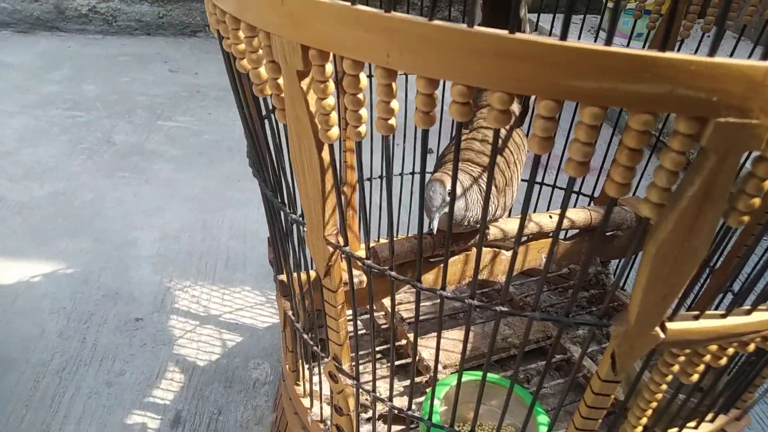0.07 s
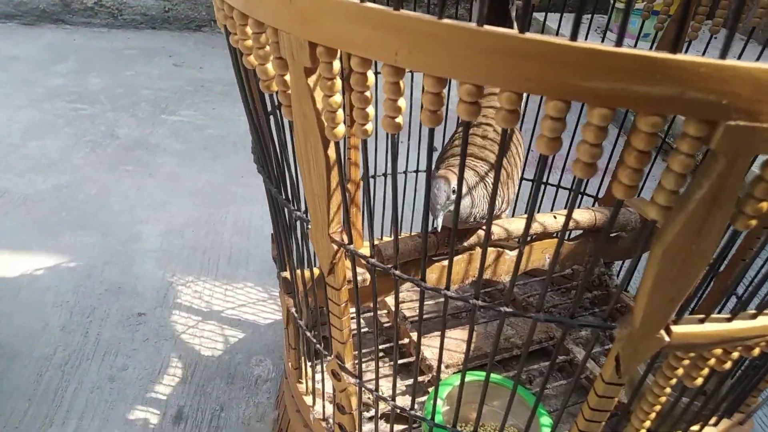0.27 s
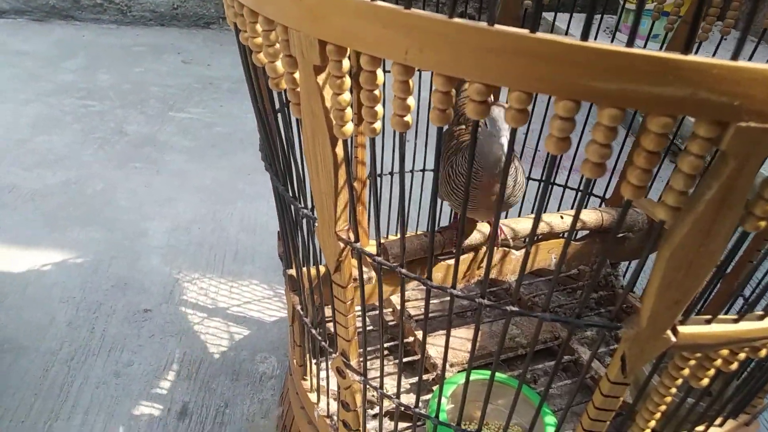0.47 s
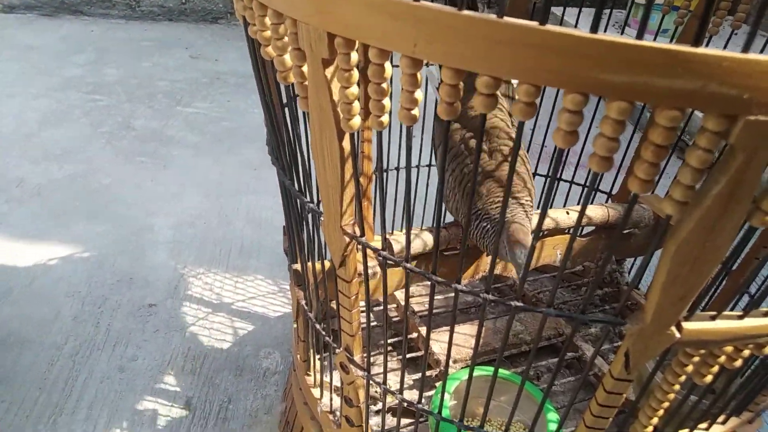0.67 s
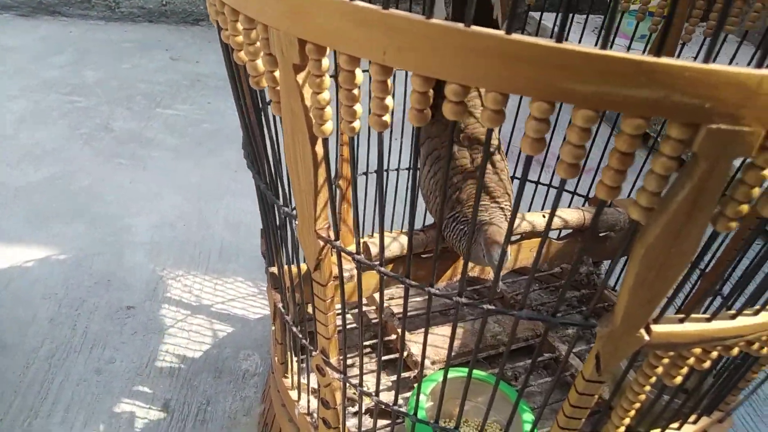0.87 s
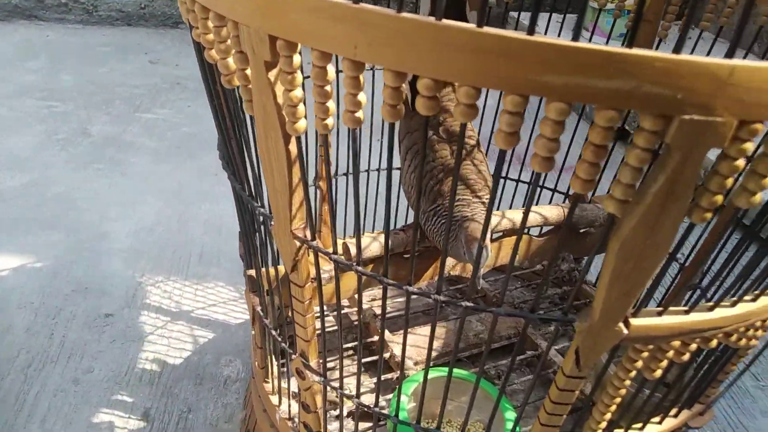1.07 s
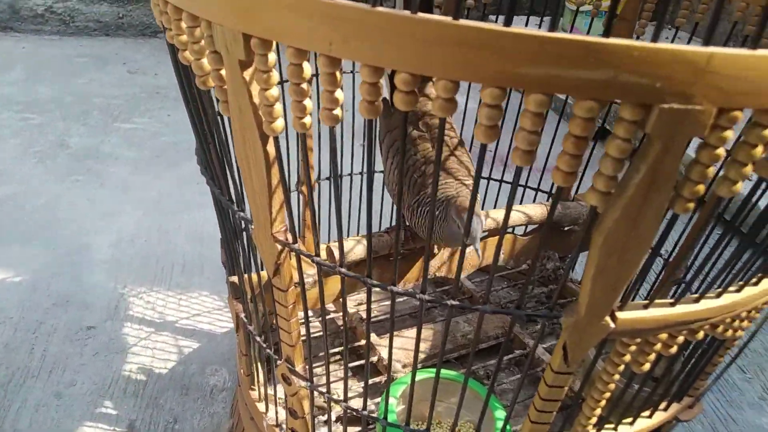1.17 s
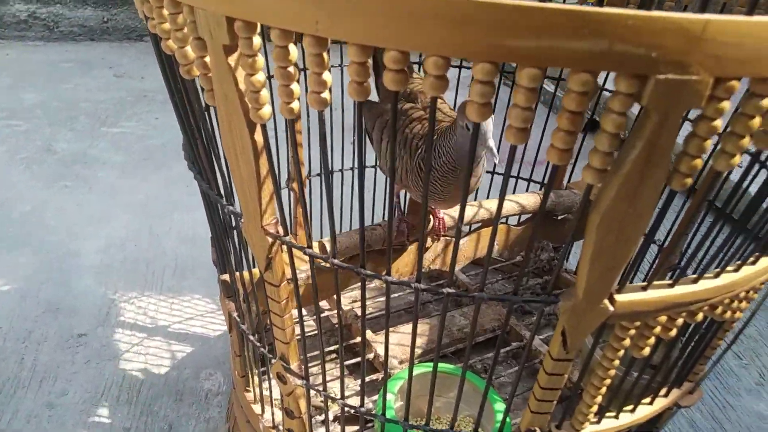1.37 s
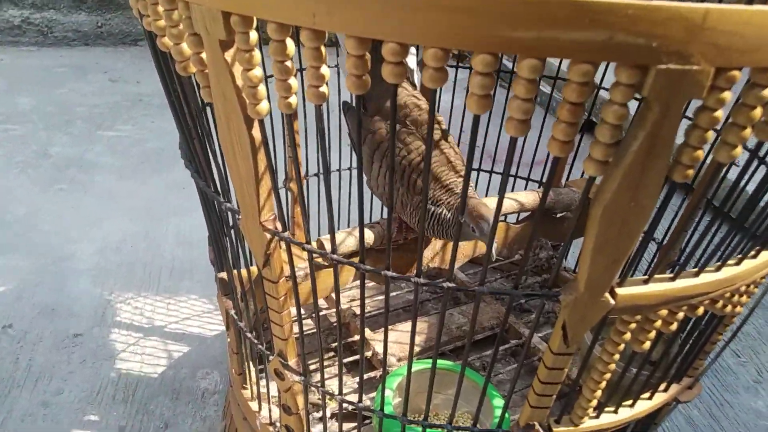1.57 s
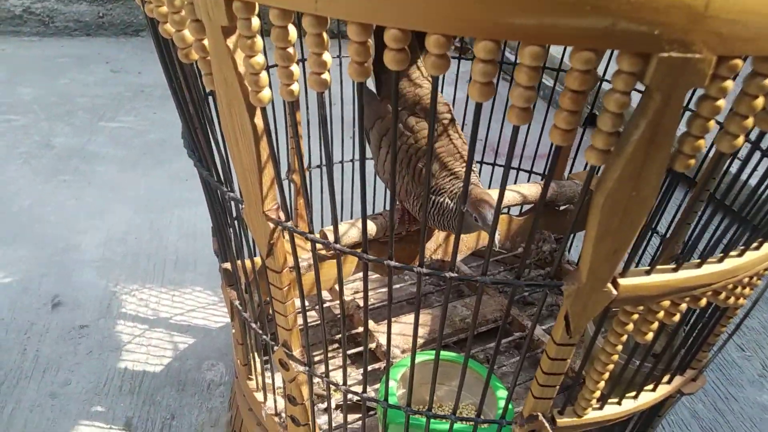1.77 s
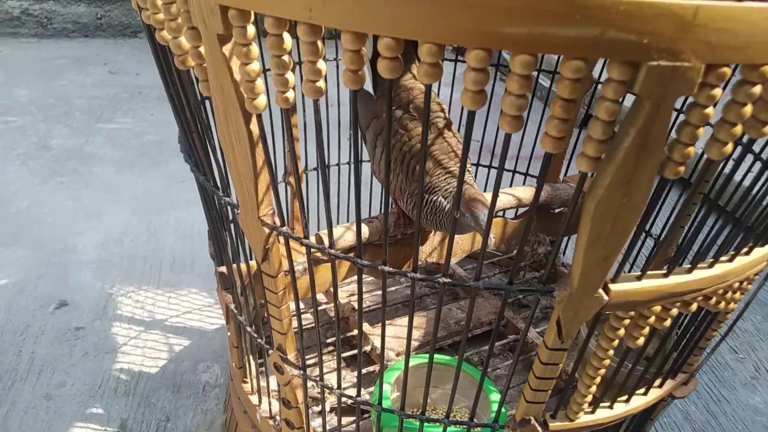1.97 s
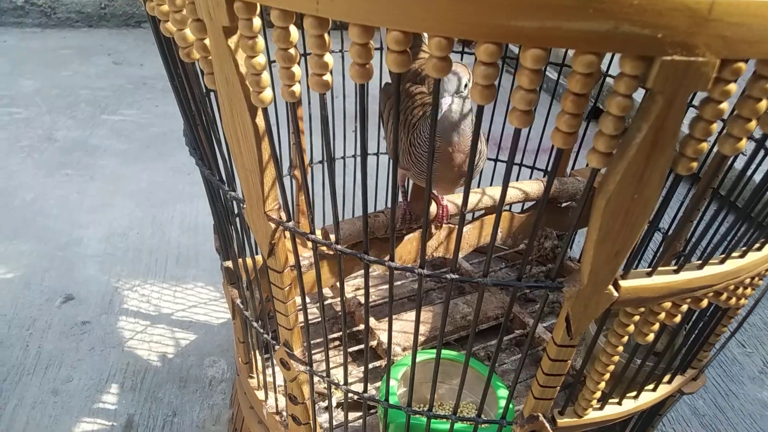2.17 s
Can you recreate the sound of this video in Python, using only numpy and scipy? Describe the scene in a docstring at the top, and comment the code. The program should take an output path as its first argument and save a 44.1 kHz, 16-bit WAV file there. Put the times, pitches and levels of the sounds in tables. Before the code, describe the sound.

Dove cooing close by, three buzzy rolling notes, with faint wire clinks and perch knocks outdoors.

```python
"""A zebra dove in a wooden cage outdoors gives three coos; the first is already in its whistle as we begin.
A coo is a short rattle and a long fading rasp, both made of uneven pulses of tone, around a sagging sine whistle.
The dove shifts on its perch: claws tick (short noise), wires ring (narrow noise bands) and wood knocks (sines).
Other doves and a small bird answer from further off with wavering tones and hoarse bands, over quiet yard noise,
a faint echo and low handling bumps of the microphone over a low rumble, all made of shaped noise."""
import sys
import numpy as np
from scipy import signal
from scipy.fft import rfft, irfft, next_fast_len
from scipy.io import wavfile
from scipy.ndimage import uniform_filter1d, map_coordinates

SR = 44100
rng = np.random.default_rng(int(sys.argv[2]) if len(sys.argv) > 2 else 0)


def digitize_waveform(pressure):
    """Quantize a signal to 16-bit integers and store it at the path in sys.argv[1].

    Rows of a 2-D input are taken as channels; values are limited to [-1, 1].
    """
    field = np.atleast_2d(pressure).T
    bounded = np.clip(field, -1, 1)
    quanta = np.round(bounded * 32767).astype(np.int16)
    wavfile.write(sys.argv[1], SR, quanta)


N = 97461


def amp(db):
    """Turn decibels into a gain."""
    return 10 ** (np.asarray(db) / 20)


def unit(x):
    """Scale to an rms of 1."""
    return x / np.sqrt(np.mean(x ** 2) + 1e-20)


def clock():
    """Time of each sample in seconds."""
    return np.arange(N) / SR


def over_time(points):
    """Join (time, value) points with straight lines."""
    return np.interp(clock(), *np.transpose(points))


def along(points, hz):
    """Join (pitch, value) points with straight lines on a log pitch axis."""
    point_hz, value = np.transpose(points)
    return np.interp(np.log(hz + 1), np.log(point_hz + 1), value)


def wobble(rate):
    """A smooth random curve through rate random points a second."""
    points = rng.standard_normal(int(N * rate / SR) + 4)
    return map_coordinates(points, [clock() * rate])


def filtered(x, response):
    """Change the loudness of each frequency; zero padding keeps the end from wrapping round."""
    size = next_fast_len(N + SR // 2)
    spectrum = rfft(x, size) * response(np.fft.rfftfreq(size, 1 / SR))
    return irfft(spectrum, size)[..., :N]


def coloured(x, colour):
    """Shape a sound with a table of frequency_hz, level_db."""
    return filtered(x, lambda hz: amp(along(colour, hz)))


def noise(colour, side_db):
    """Coloured stereo noise of rms 1; side_db sets how much the two ears differ."""
    mid, side = coloured(rng.standard_normal((2, N)), colour)
    side = amp(side_db) * side
    return unit(np.array([mid + side, mid - side]))


def pan(db):
    """Left and right gains for a level difference; a positive one leans left."""
    gains = amp(np.vstack([db, -db]) / 2)
    return gains / gains.mean(axis=0)


def gate(start, length, attack, release):
    """Smooth attack, hold and release, all in seconds."""
    t = clock() - start
    return np.sin(np.pi / 2 * np.clip(np.minimum(t / attack, (length - t) / release), 0, 1))


def decay(age, t60):
    """Die away by 60 dB in t60 seconds."""
    return np.exp(-np.log(1000) * age / t60)


def fade(start, attack, t60):
    """A quick rise and an exponential decay."""
    age = np.maximum(clock() - start, 0)
    return (1 - np.exp(-age / attack)) * decay(age, t60)


def turn(hz):
    """Running phase of a pitch curve."""
    return 2 * np.pi * np.cumsum(hz + np.zeros(N)) / SR


def narrow(hz, width):
    """A narrow band of noise about a pitch; faster wobbles make it wider."""
    phase = turn(hz)
    return wobble(width) * np.cos(phase) + wobble(width) * np.sin(phase)


# thin hiss that rides on each coo: start_s, end_s, level_db
HISSES = [(-.2, .4, -58), (0.735, 1.286, -59), (1.583, 2.096, -61)]
HISS_HZ, HISS_DROP_HZ, HISS_DROP_S = 6724, 1280, 0.048  # pitch, fall by the end, time constant of the fall


def hiss():
    """A faint high resonance, a narrow noise band that drops as each coo closes."""
    out = np.zeros(N)
    for start, end, db in HISSES:
        hz = HISS_HZ - HISS_DROP_HZ * np.exp(np.minimum(clock() - end, 0) / HISS_DROP_S)
        out += amp(db) * gate(start, end - start, .02, 0.02) * narrow(hz, width=650)
    return out


# whistled part of each coo: start_s, length_s, first_pitch_hz, last_pitch_hz, level_db
WHISTLES = [(-.11, 0.2, 1185, 1067, -22.5), (0.749, 0.24, 1129, 1011, -20.5), (1.638, .23, 1117, 1027, -21)]
# overtones, which flicker: multiple of the pitch, average level_db against the whistle
OVERTONES = [(2, -42.5), (5, -44.5), (6, -53.5)]
SAG_POWER = 1.5  # above 1, the sag speeds up
WHISTLE_ATTACK_S, WHISTLE_RELEASE_S = 0.0071, 0.022
WHISTLE_JITTER = .002  # random share of the pitch


def whistle():
    """A nearly pure tone that sags ever faster until it breaks into the rasp."""
    out = np.zeros(N)
    for start, length, first_hz, last_hz, db in WHISTLES:
        progress = np.clip((clock() - start) / length, 0, 1)
        hz = first_hz + (last_hz - first_hz) * progress ** SAG_POWER
        phase = turn(hz * (1 + WHISTLE_JITTER * wobble(120)))
        tone = np.sin(phase)
        for k, level in OVERTONES:
            tone += amp(level + 5.5 * wobble(60)) * np.sin(k * phase + 0.14 * k * wobble(250))
        loudness = amp(db + 0.79 * wobble(40)) * gate(start, length, WHISTLE_ATTACK_S, WHISTLE_RELEASE_S)
        out += np.sqrt(2) * loudness * tone
    return out


def steady(x):
    """Even out the slow level of a pulse train."""
    power = np.abs(uniform_filter1d(np.abs(x) ** 2, size=1300))
    return x / np.sqrt(power + 0.0014 * np.max(np.abs(x)) ** 2)


# pulses harden into snaps at either end of a coo: start_s, end_s, final level_db (before the trim and colour)
SNAPS = [(.08, 0.401, -38.5), (0.685, 0.745, -46), (1.0, 1.282, -43), (1.592, 1.628, -46.5),
         (1.885, 2.11, -45)]
SNAP_DB = 1  # trim
SNAP_GROWTH_DB, SNAP_GROWTH_S = 8, 0.14  # rise towards the end, and its time constant


def hardness():
    """Strength of the snaps, growing towards the end of each rattle."""
    out = np.zeros(N)
    for start, end, db in SNAPS:
        growth = SNAP_GROWTH_DB * (np.exp(np.minimum(clock() - end, 0) / SNAP_GROWTH_S) - 1)
        out += gate(start, end - start, 0.01, .005) * amp(db + SNAP_DB + growth)
    return out


# short ringing at the edge of each pulse: pitch_hz, level_db, t60_s (time to fall 60 dB)
SNAP_MODES = [(632, 0, .014), (1170, 5, .018), (1420, -3.5, 0.017), (1587, -2, 0.014)]


def edge_snap(age):
    """The edge of a pulse rings a few short resonances."""
    ring = sum(amp(db) * np.sin(2 * np.pi * hz * age) * decay(age, t60) for hz, db, t60 in SNAP_MODES)
    return ring * (1 - np.exp(-age / 0.00027))


# rattle and rasp of each coo: time_s, level_db (before trim and throat), pitch_hz (before sag and waver)
RASPS = [
    [(0.0, -29, 928), (0.042, -23.5, 937), (0.054, -30.5, 927), (0.086, -17.5, 912), (0.214, -19, 909),
     (0.23, -25, 889), (0.266, -20, 902), (0.386, -30, 888.4), (0.41, -46, 901)],
    [(0.698, -36.5, 910), (0.75, -15.5, 919), (0.772, -30.5, 923), (0.886, -35, 954), (0.992, -15.5, 930),
     (1.034, -17, 897), (1.218, -26, 895), (1.274, -29.5, 908), (1.295, -47, 909)],
    [(1.587, -33, 902), (1.613, -46, 904), (1.621, -24.5, 905), (1.633, -16.5, 899.7), (1.675, -39, 916),
     (1.767, -38.5, 958), (1.859, -21, 923), (1.889, -17, 897), (2.067, -26, 880), (2.12, -43.5, 926)],
]
# colour the throat gives the voice: frequency_hz, level_db
THROAT = [(300, -41), (600, -20), (740, -8), (900, 0), (1120, 6), (1230, -1.5), (1350, -22.5), (3000, -46)]
# colour of the snaps: frequency_hz, level_db
SNAP_COLOUR = [(250, -24.5), (500, 3), (1650, 0.5), (2100, -28), (4000, -22)]
# direction of the rasp, right at first and left at the end: time_s, left_minus_right_db
DOVE_SIDE = [(0, -4.5), (1.9, -2), (2.04, 3.5), (2.12, 4)]
LOUD_DB, SOFT_DB = -19, -32  # table levels that count as full effort and none
PULSE_RATE_LOUD, PULSE_RATE_SOFT = 116, 126  # pulses a second
PULSE_SCATTER, PULSE_SIZE_DB, PHASE_SLIP = 0.1042, 2.5, 1  # typical spread: share of a period, dB, radians
RISE_LOUD_S, RISE_SOFT_S = 0.0036, 0.0027  # time to the top of a pulse
ALTERNATE_DB = 0.66  # loud pulses are stronger and weaker in turn by this much
TONE_SHARE = 0.36  # unbroken tone between pulses at full effort
WAVER_HZ, RASP_SAG_HZ = 12.03, 13.66  # random waver, and sinking at full effort
RASP_DB, RASP_OCTAVE_DB = -0.44, -36.5  # trim of the voice, and its octave, against the table level


def rasp():
    """A voice chopped into uneven pulses, slow and round when loud, quick and sharp when soft, with snaps."""
    t, out = clock(), np.zeros((2, N))
    age = t[:SR // 25]
    snap = edge_snap(age)
    for rows in RASPS:
        times, db, hz = np.transpose(rows)
        start, end = times[0], times[-1]
        level = np.interp(t, times, db)
        effort = np.clip((level - SOFT_DB) / (LOUD_DB - SOFT_DB), 0, 1)
        rate = PULSE_RATE_SOFT + (PULSE_RATE_LOUD - PULSE_RATE_SOFT) * effort
        cycles = np.cumsum(rate * (t >= start)) / SR
        pulses = np.zeros(N + len(age), complex)  # the complex angle holds each pulse's phase slip
        snaps = np.zeros(N + len(age))
        for k, (late, size, slip) in enumerate(rng.standard_normal(size=(90, 3))):
            i = np.searchsorted(cycles, max(k + 0.1892 + PULSE_SCATTER * late, 1 / SR))
            if i < N and t[i] < end:
                u = age / (RISE_SOFT_S + (RISE_LOUD_S - RISE_SOFT_S) * effort[i])
                gain = amp(PULSE_SIZE_DB * size + ALTERNATE_DB * effort[i] * (-1) ** k)
                shape = (u * np.exp(1 - u)) ** 2.53
                pulses[i:i + len(age)] += gain * shape * np.exp(1j * slip * PHASE_SLIP)
                snaps[i:i + len(age)] += gain * snap
        tone = TONE_SHARE * effort * gate(start, end - start, .01, .01)
        pitch = np.interp(t, times, hz) - RASP_SAG_HZ * effort + WAVER_HZ * wobble(25)
        voice = steady(pulses[:N] + tone) * np.exp(1j * turn(pitch))
        body = coloured(np.sqrt(2) * amp(level + RASP_DB) * voice.imag, THROAT)
        octave = amp(level + RASP_OCTAVE_DB) * (voice ** 2).imag  # squaring doubles the pitch
        edge = coloured(hardness() * steady(snaps[:N]), SNAP_COLOUR)
        out += (body + octave + edge) * pan(over_time(DOVE_SIDE))
    return out


# colour of the distant murk: frequency_hz, level_db
YARD = [(25, -2.5), (60, -7), (125, -5.5), (220, -14.5), (400, -18), (600, -15), (950, -15.5), (1400, -37),
        (2500, -29), (4000, -34), (16000, -37.5)]
# colour of the fine hiss: frequency_hz, level_db
AIR = [(2000, 0), (4000, -9), (6500, -4.5), (9500, -1.5), (12000, -8.5), (16000, -31)]
# loudness of the fine hiss: time_s, level_db
AIR_LEVEL = [(0, -41.5), (.25, -51), (.45, -51.5), (.7, -51), (1.1, -52.5), (1.5, -53), (1.8, -57),
             (2.0, -49.5), (2.21, -48)]
# low handling bumps of the microphone: time_s, level_db
BUMPS = [(.51, -43.5), (0.838, -32), (.94, -41.5), (1.19, -41), (1.275, -44), (1.73, -50), (2.14, -46)]


def yard(floor_db=-51, rumble_db=-53.5):
    """Distant murk, a fine hiss and soft low bumps that lean right, over a low rumble."""
    floor = amp(floor_db + wobble(6.6)) * noise(YARD, side_db=-24) * pan(db=0.5)
    air = amp(over_time(AIR_LEVEL) + 0.33 * wobble(28.3)) * noise(AIR, side_db=0.5)
    bumps = sum(amp(db) * np.exp(-((clock() - s) / 0.021) ** 2) for s, db in BUMPS)
    # colour of the bumps and rumble: frequency_hz, level_db
    low_colour = [(15, 8.5), (35, 7.5), (70, -5), (200, -19.5), (600, -45.5), (3000, -74.5)]
    low = (bumps + amp(rumble_db)) * noise(low_colour, side_db=-9.5) * pan(db=-14)
    return floor + air + low


# how long the echo lasts: frequency_hz, t60_s (time to fall 60 dB)
ECHO = [(200, .25), (1000, 0.66), (10000, 0.067)]


def echo(x):
    """The walls of the yard answer faintly: a tail of noise dies away at its own speed in each band."""
    hz, t, bands = signal.stft(rng.standard_normal((2, SR // 2)), SR, nperseg=256)
    fading = bands * decay(t, along(ECHO, hz)[:, None])
    tail = signal.istft(fading, SR, nperseg=256)[1]
    return signal.fftconvolve(x[None], tail / np.linalg.norm(tail[0]), axes=1)[:, :N]


# ringing touches on the wires: time_s, level_db (before the mix levels), left_minus_right_db
CLINKS = [(0.4424, -33.5, 3), (0.818, -26.5, 0.5), (0.8907, -23.5, 2.5), (0.9898, -25, 1.5),
          (1.1524, -26, 4.5), (1.324, -25.5, 2), (2.1144, -26.5, 8.5)]
# notes of a wire: pitch_hz, average level_db (it varies by touch and ear), t60_s (time to fall 60 dB)
WIRE = [(4700, -17, 0.044), (5500, -27, 0.89), (7600, -11, 0.15), (9680, -4.5, 0.19), (11500, -30, 0.18),
        (12200, -18.5, 0.34), (13690, -26, 0.55), (15000, 0, 0.037)]
# colour of the scrape in each clink: frequency_hz, level_db
SCRAPE_COLOUR = [(1000, -14), (3000, -9.5), (6000, -16.5), (10000, -4), (13000, -16), (15500, -4.5)]
# dry claw ticks: time_s, level_db (before the mix level), left_minus_right_db
TICKS = [(0.5112, -20.5, 5), (0.5322, -32.5, -2.5), (0.549, -37, -3), (0.602, -36.5, -1.5),
         (1.4123, -24.5, 0.5), (1.4967, -34.5, -4.5), (1.927, -34, 2.5), (2.0394, -36.5, -12)]
# colour of a tick: frequency_hz, level_db
TICK_COLOUR = [(300, -4), (1400, -10.5), (3000, -14), (5000, -2), (9000, 6.5), (12000, -1), (16000, -7.5)]


def wire_ring(start):
    """A touched wire rings in several narrow noise bands, each fading at its own speed."""
    out = np.zeros(N)
    for hz, level, t60 in WIRE:
        out += amp(level + rng.normal(0, 5.3)) * fade(start, .001, t60) * narrow(hz, width=700)
    return out


def cage(ring_db=-16, scrape_db=-11, tick_db=-6):
    """Claws touch the wires, which ring, or tick dryly on the wood as short bursts of noise."""
    out = np.zeros((2, N))
    scrape, tick = noise(SCRAPE_COLOUR, side_db=0.5), noise(TICK_COLOUR, side_db=1)
    for start, db, side in CLINKS:
        ring = amp(ring_db) * np.array([wire_ring(start) for _ in 'LR'])
        rub = amp(scrape_db) * fade(start, 0.00034, 0.15) * scrape
        out += amp(db) * pan(side) * (ring + rub)
    for start, db, side in TICKS:
        out += amp(db + tick_db) * pan(side) * fade(start, 0.0002, 0.026) * tick
    return out


# soft knocks on the perch: time_s, level_db (added to each wood note's level)
KNOCKS = [(.512, -41), (.603, -41), (1.414, -35.5), (1.498, -51)]
# notes of the wood: pitch_hz, level_db, t60_s (time to fall 60 dB)
PERCH = [(553, -4.5, 0.092), (1010, 2, 0.031), (1430, 0, 0.015)]


def perch():
    """The bird's steps knock the wooden perch, which answers with short sine notes."""
    out = np.zeros(N)
    for start, db in KNOCKS:
        for hz, level, t60 in PERCH:
            note = np.sin(2 * np.pi * hz * (clock() - start))
            out += amp(db + level) * fade(start, 0.00039, t60) * note
    return out


# bands of the small bird's chirp: starting pitch_hz, level_db (added to the chirp level)
CHIRP_BANDS = [(3200, 5), (5150, 2)]
CHIRP_S, CHIRP_DB, CHIRP_FALL_HZ_PER_S = .688, -43.5, 10000  # start, level, speed of the fall
CHIRP_ATTACK_S, CHIRP_DECAY_S = .016, 0.29  # rise time constant, time to fall 60 dB


def chirp():
    """One hoarse chirp of a distant small bird: wide noise bands that fall at first, diffuse and to the left."""
    fall = CHIRP_FALL_HZ_PER_S * np.clip(clock() - CHIRP_S, 0, .04)

    def one_ear():
        """Fresh noise for each ear makes the chirp diffuse."""
        return sum(amp(db) * narrow(hz - fall, width=1400) for hz, db in CHIRP_BANDS)

    bands = np.array([one_ear() for _ in 'LR'])
    return amp(CHIRP_DB) * fade(CHIRP_S, CHIRP_ATTACK_S, CHIRP_DECAY_S) * bands * pan(db=2)


# faint notes of other doves: start_s, length_s, pitch_hz, level_db
FAR_NOTES = [(1.263, 0.052, 1127, -45), (1.315, 0.036, 963, -45.5), (1.336, 0.038, 1156, -43.5),
             (1.387, 0.028, 890, -40), (1.388, 0.028, 1120, -42), (1.463, 0.027, 895, -39.5),
             (1.463, .08, 1085, -50.5), (1.555, 0.043, 997, -42.5), (2.136, 0.053, 970, -36.5),
             (2.174, 0.059, 953, -41.5)]


def far_birds():
    """Short wavering notes of other doves: a sine blurred by a narrow noise band."""
    out = np.zeros(N)
    for start, length, hz, db in FAR_NOTES:
        note = np.sqrt(2) * np.sin(turn(hz)) + .5 * narrow(hz, width=200)
        out += amp(db) * gate(start, length, .012, 0.03) * note
    return out


def scene():
    """The near dove whistles from the right, among its cage sounds, the far birds, the echo and the yard."""
    dove = whistle() * pan(db=-5.0) + rasp()
    far = far_birds()
    walls = echo(amp(-20) * dove.mean(axis=0) + amp(-8) * far)
    return dove + hiss() + far + chirp() + walls + cage() + perch() + yard()


TOP_HZ = 16300


def record(dry):
    """Nothing is kept above the band limit."""
    return filtered(dry, lambda hz: hz < TOP_HZ)


dry = scene()
out = record(dry)
digitize_waveform(out)
```